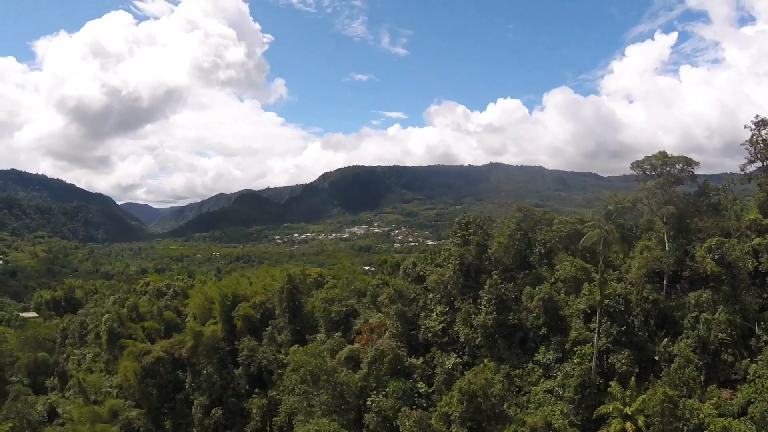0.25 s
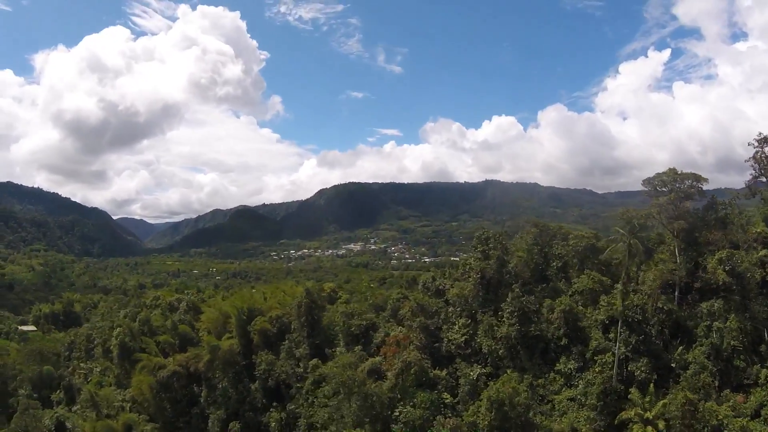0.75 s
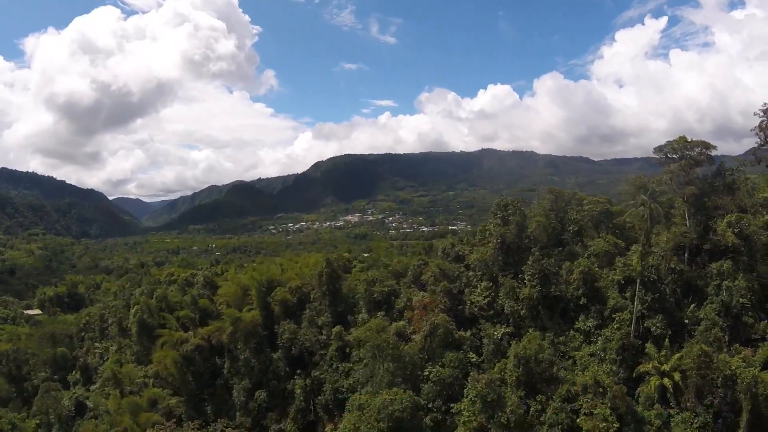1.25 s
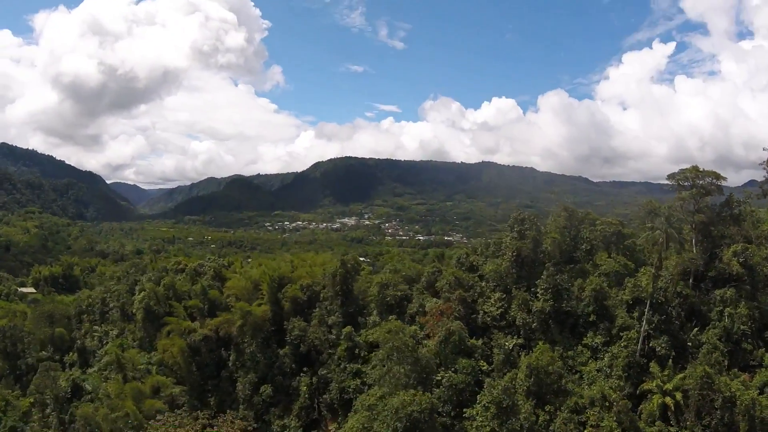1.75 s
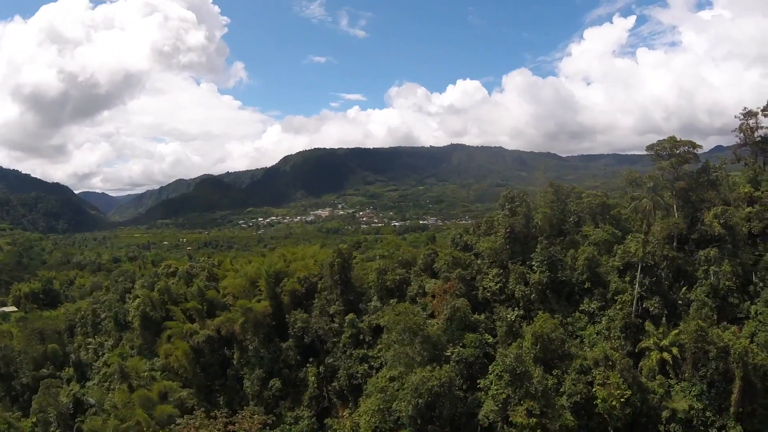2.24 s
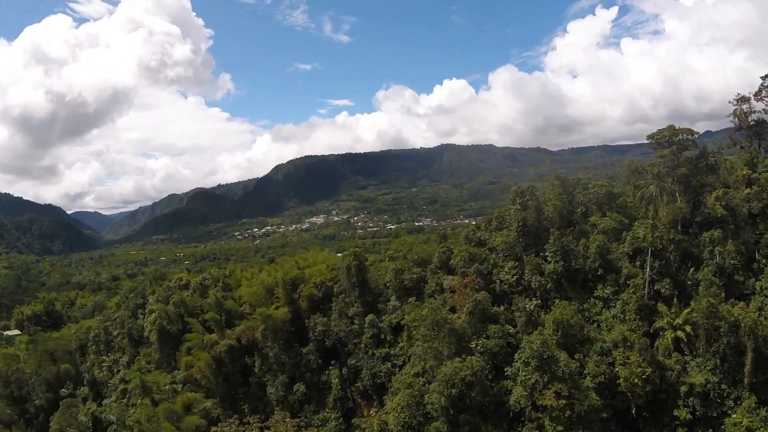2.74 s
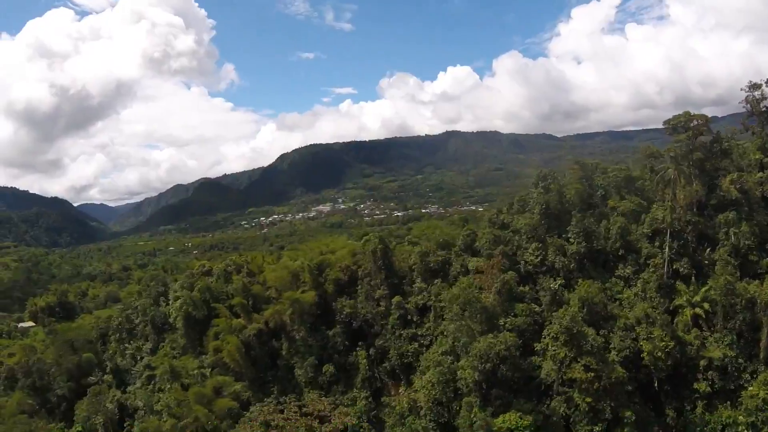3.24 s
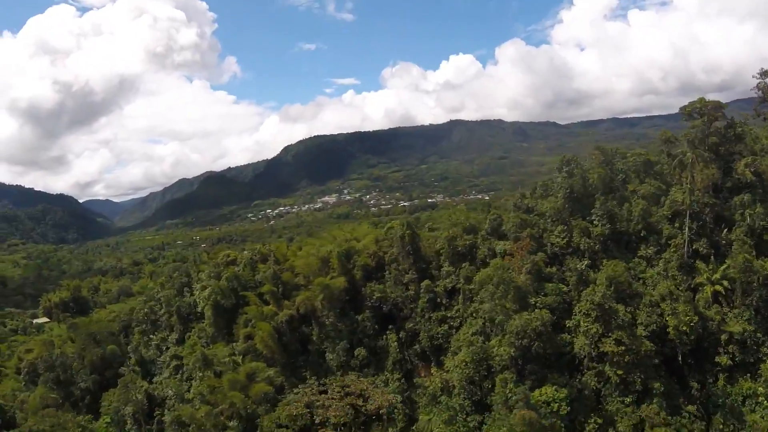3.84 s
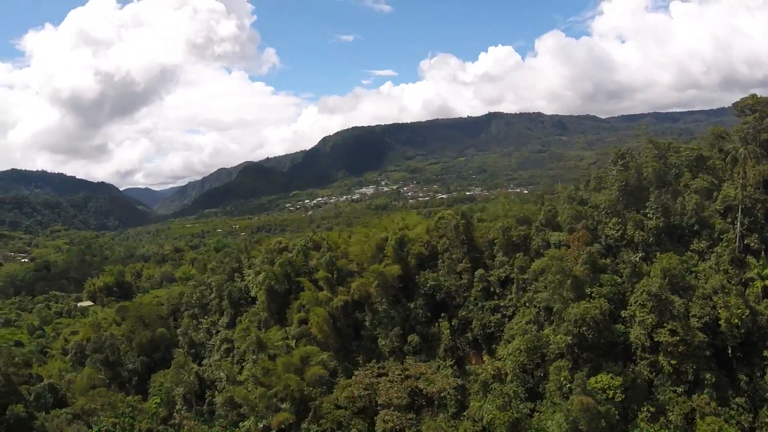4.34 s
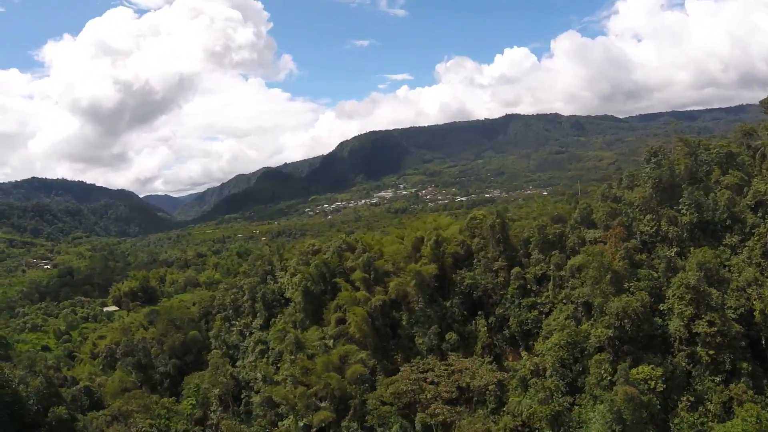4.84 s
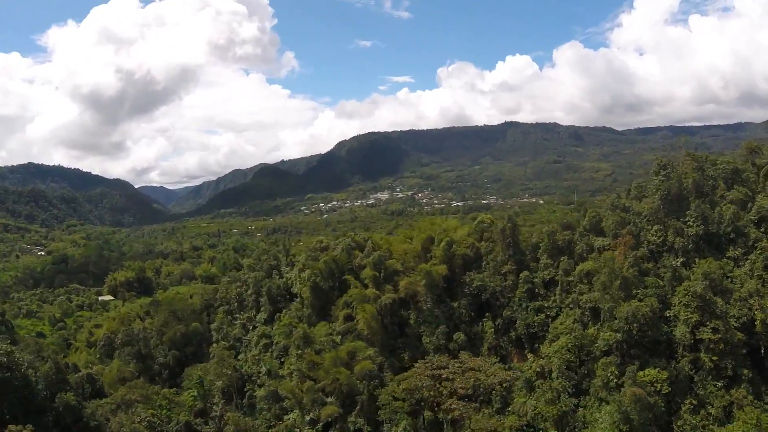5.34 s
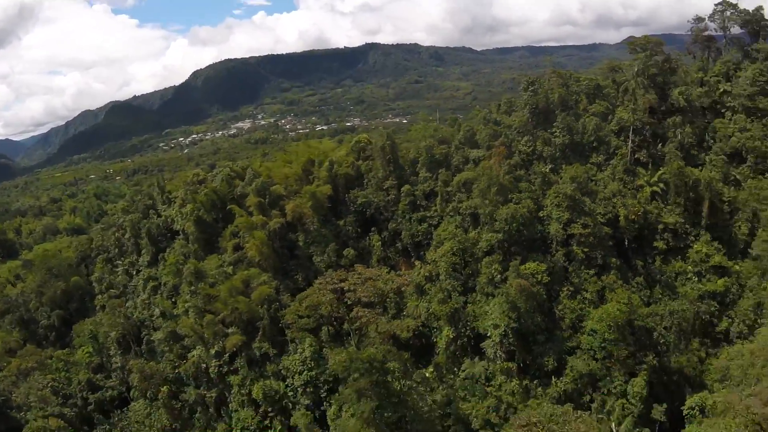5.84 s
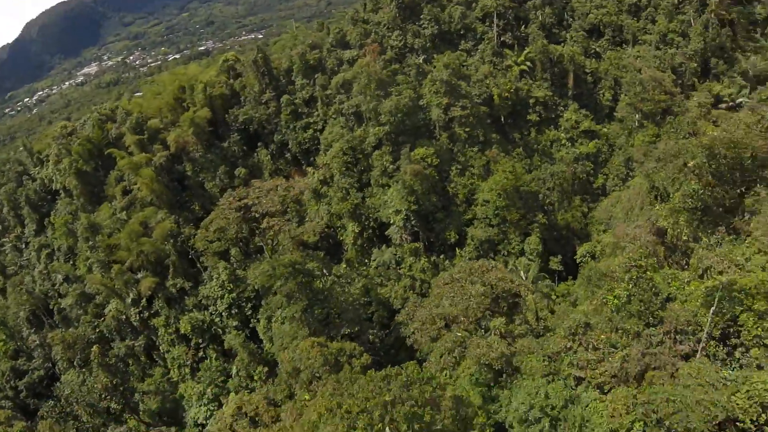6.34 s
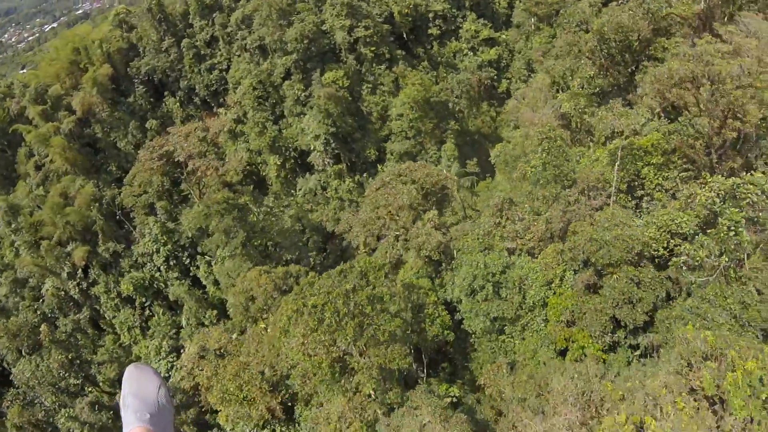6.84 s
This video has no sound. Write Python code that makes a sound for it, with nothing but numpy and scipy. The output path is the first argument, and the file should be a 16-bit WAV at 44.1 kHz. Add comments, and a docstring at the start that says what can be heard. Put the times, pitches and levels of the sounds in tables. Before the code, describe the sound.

A fast zipline trolley gives a continuous bright, gritty metallic whir with a thin high hum. Smooth wind roar fills the first second, then breaks off into deep rumble and scattered thumps. Around the middle the whir drops and turns thinner as the rider turns, and dense gusts flutter and rasp. Near the end it is fainter, with low buffets. Open air, close microphone on the rider, no echo.

```python
"""Above a forest, a zipline trolley races along a stranded steel cable, heard from a camera on the rider.
Sheaves tick over the strands: pulsed contact noise rings the trolley into a bright whir, with a thin hum.
The whir changes colour as the rider turns.
Shaped noise makes the wind: a steady roar that breaks away, then rumble, flutter, rasp and spit in gusts.
Single eddies thump the one microphone with a pressure swing, a puff and a crack."""
import sys
import numpy as np
from scipy import signal
from scipy.fft import rfft, irfft
from scipy.io import wavfile
from scipy.ndimage import uniform_filter1d, map_coordinates

SR = 44100
rng = np.random.default_rng(int(sys.argv[2]) if len(sys.argv) > 2 else 0)


def inscribe(sig):
    """Save sig as 16-bit PCM at rate SR to the path in sys.argv[1].

    A 1-D sig is mono; a 2-D sig holds one channel per row.
    Samples are clipped to [-1, 1] before scaling.
    """
    pcm = np.round(np.clip(np.atleast_2d(sig).T, -1, 1) * 32767)
    wavfile.write(sys.argv[1], SR, pcm.astype(np.int16))


N = 312624
T = np.arange(N) / SR
BINS = np.maximum(np.fft.rfftfreq(N, 1 / SR), 1)  # Hz

# colour of the finest eddies, in gusts and cracks: freq_hz, relative_db_per_hz
SPIT_COLOUR = [(600, -5.5), (1300, 4.5), (2000, 1.5), (3000, -8), (6000, -39), (12000, -59)]


def undb(db):
    """Decibels to gain."""
    return 10 ** (np.asarray(db) / 20)


def unit(x):
    """Scale to rms 1."""
    return x / np.sqrt(np.mean(x ** 2))


def curves(table):
    """Columns of a time table, interpolated to one value a sample."""
    time_s, *columns = np.transpose(table)
    return [np.interp(T, time_s, column) for column in columns]


def colour(points):
    """Gain at every frequency from (Hz, dB) points, linear in dB over log frequency."""
    hz, db = np.transpose(points)
    return undb(np.interp(np.log(BINS), np.log(hz), db))


def shaped(x, gain):
    """Filter by a gain per frequency; rms 1."""
    return unit(irfft(rfft(x) * gain, N))


def noise():
    """White noise."""
    return rng.standard_normal(N)


def walk(rate_hz):
    """Smooth chance up to the given rate; rms 1."""
    return shaped(noise(), 1 / (1 + (BINS / rate_hz) ** 4))


def steady(x, seconds):
    """Even out swells of a noise slower than the given time."""
    size = max(int(seconds * SR), 2)
    power = uniform_filter1d(uniform_filter1d(x ** 2, size), size)
    return x / np.sqrt(power + 1e-9)


def lift(x, band, db):
    """Raise or lower one band by a level that moves in time."""
    return x + irfft(rfft(x) * band, N) * (undb(db) - 1)


def strand_phase(wobble_share=.005, wobble_hz=12):
    """Phase of the strands passing under the sheaves; the speed wobbles a little."""
    # ride speed before wobble: time_s, strand_rate_hz
    speed = [(0, 751), (.4, 757), (1.05, 763.6), (1.35, 767.4), (2.25, 771.5), (2.65, 772.3), (5, 795.7),
             (7.09, 782)]
    strand_hz, = curves(speed)
    return 2 * np.pi * np.cumsum(strand_hz * (1 + wobble_share * walk(wobble_hz))) / SR


def contact_noise(phase, strands_per_turn=13.5, worn=0.5, order=768):
    """Fresh cable grit, plus sheave wear marks that come round with every turn."""
    turn = phase / (2 * np.pi * strands_per_turn) % 1
    # equally rough at every wavelength
    groove = unit(irfft(np.exp(2j * np.pi * rng.random(order // 2 + 1))))
    wear = map_coordinates(groove, [turn * order], mode="grid-wrap")
    return noise() + worn * wear


def shimmer(x):
    """Neighbouring resonances swell and fade on their own as the trolley sways."""
    width_hz, depth_db, rate_hz = 260, 1.2, 3
    for hz in np.linspace(3100, 6600, 7):
        band = 1 / (1 + ((BINS - hz) / width_hz) ** 4)
        x = lift(x, band, depth_db * walk(rate_hz))
    return unit(x)


def drift(x, drift_share=.007, drift_hz=3):
    """All resonances wander in pitch together as the load shifts."""
    wander = drift_share * walk(drift_hz)
    position = np.arange(N) + np.cumsum(wander - wander.mean())
    return map_coordinates(x, [position], order=5, mode="mirror")


def whir(phase, pulsing=0.067, pulsing_turned=0.048, flicker_db=0.33, chatter_db=0.4, treble_hz=7800):
    """Contact noise, pulsed by each strand, rings the trolley; pose decides which rings reach the microphone."""
    # whir at the microphone, shaded and bared as the rider swings: time_s, level_db
    whir_level = [(0, -21.5), (1.1, -19.5), (1.7, -20.5), (2.2, -23), (2.65, -22.5), (2.69, -27.5),
                  (3.08, -28), (3.89, -26.5), (3.98, -29.5), (4.1, -28), (4.7, -25.5), (5.2, -24),
                  (5.5, -23), (5.54, -27.5), (5.96, -28.5), (6.04, -32), (6.17, -30.5), (6.6, -32),
                  (7.09, -29)]
    # gain of the band above treble_hz: time_s, gain_db
    treble_gain = [(0, -15.5), (1.45, -9.5), (1.85, -13.5), (2.3, -7), (2.65, -7), (3.05, -7), (3.85, 1.5),
                   (5, 3), (6.55, 4), (7.09, -0.5)]
    # rider's turn: time_s, pose (0 open to the trolley, 1 half turned, 2 side on, 3 leaning,
    # 4 tipping forward, 5 looking down), hollow_gain_db
    rider_pose = [(0, 0, 0.5), (1.55, -0.2, 3), (2.0, 0.8, -10.5), (2.35, 1, -7.5), (2.65, 1.4, -8.5),
                  (2.75, 2, -11), (3.3, 2, -2.5), (3.9, 2, -2), (5.5, 2, 0), (5.72, 2.5, -2), (5.85, 3, -2),
                  (5.96, 3, 1.5), (6.05, 3.5, 2), (6.3, 4, 0), (6.48, 4, 0), (6.68, 5, 0), (7.09, 5, -5)]
    # resonances of sheaves and side plates, half gain 0.6 width off centre:
    # centre_hz, width_hz, relative_db in pose 0, 1, 2, 3, 4, 5
    resonances = [(1710, 46, -7, -14, -25, -13, -16, -7), (2280, 234, -5, -7, -9.5, -10, -11, -14),
                  (2756, 280, -5.5, -10, -12.5, -17, -21, -18), (3090, 220, 0.5, -3, -15, -17, -18, -28),
                  (3380, 280, -1.5, -2.5, -3.5, -2, -4.5, -6), (3662, 103, 3, -2, -4, 0, -1.5, -3.5),
                  (3884, 100, 0, 1, -2.5, 0, 0, -19), (4320, 690, -9, -6.5, -11, -9, -7, -6.5),
                  (4596, 62, 3, -12, -5, -12, -3, -5), (4700, 160, 2.5, -1, -5.5, -9, 1, 4.5),
                  (4910, 155, -0.5, 1, 1.5, -5, 0, 1.5), (5110, 180, 1.5, -6, -12, -12, -7, 0),
                  (5406, 165, 1, 0, 1, 3.5, -11, -4), (5590, 310, -7, -4, -11, -2, -13, -4),
                  (5806, 110, -0.5, -1.5, 3.5, 2, -9, -10), (6270, 370, -10, -12, -4, 4, -5, -22),
                  (6470, 170, 0, 2, 2.5, 3, 0, -3), (6636, 155, -2.5, -6, 3.5, 5, 2, -8),
                  (6910, 180, -4, 0.5, -3, -4, -4, -16), (7080, 220, -1.5, -7, -6.5, -10, -6, -8),
                  (7540, 260, -6.5, -7, -7, -22, -20, -22), (7820, 240, -4.5, -6, -5, -10, -10, -18),
                  (8280, 370, -26, -14, -9.5, -9, -16, -19), (8734, 236, -9, -7.5, -7, -3.5, -11, -17),
                  (9350, 370, -4.5, -14, -24, -15, -23, -21), (10680, 280, -24, -20, -23, -26, -27, -26)]
    # broad rolling noise under the resonances: freq_hz, relative_db_per_hz
    roll = [(210, -49), (720, -26), (1100, -14.5), (1450, -13), (2450, -13), (4400, -11), (7100, -13.5),
            (9100, -19.5), (10400, -29.5), (11400, -64), (12400, -47), (13300, -51)]
    hollow_hz, hollow_width_hz = 6090, 1400

    level_db, = curves(whir_level)
    treble_db, = curves(treble_gain)
    pose, hollow_db = curves(rider_pose)
    depth = np.interp(pose, [0, 1], [pulsing, pulsing_turned])
    pulses = 1 + depth * np.cos(phase)
    unevenness = undb(flicker_db * walk(5.6) + chatter_db * walk(200))
    contact = contact_noise(phase) * pulses * unevenness
    roll_power = colour(roll) ** 2
    out = 0
    for k in range(len(resonances[0]) - 2):
        ring_power = 0
        for hz, width_hz, *db in resonances:
            ring = undb(db[k]) / (1 + ((BINS - hz) / (0.6 * width_hz)) ** 2)
            ring_power = ring_power + ring ** 2
        share = np.clip(1 - abs(pose - k), 0, 1)
        out = out + share * shaped(contact, np.sqrt(ring_power + roll_power))
    out = drift(shimmer(out))
    # at some angles one band cancels
    hollow_band = 1 / (1 + ((BINS - hollow_hz) / (hollow_width_hz / 2)) ** 2)
    out = lift(out, hollow_band, hollow_db)
    # the rider shades the shortest waves most
    treble_band = 1 / (1 + (treble_hz / BINS) ** 10)
    out = lift(out, treble_band, treble_db)
    return out * undb(level_db)


def hum(phase):
    """Strands shake the whole trolley: a thin tone with two overtones, frayed by uneven contact."""
    # strand hum: time_s, level_db
    hum_level = [(0, -38), (.95, -44), (1.6, -41), (2.64, -42.5), (2.7, -52), (4.3, -44.5), (6, -53),
                 (7.09, -66)]
    waver_db, waver_hz = 1.6, 23
    fray_rad, fray_hz = .16, 40
    level_db, = curves(hum_level)
    out = 0
    for k, partial_db in enumerate([0, -12, -12], 1):
        tone = np.sin(k * (phase + fray_rad * walk(fray_hz)))
        out = out + tone * undb(level_db + partial_db + waver_db * walk(waver_hz))
    return np.sqrt(2) * out


def stream():
    """Air streaming past the camera's edge roars with slight surges, then breaks away."""
    # colour of the even flow: freq_hz, relative_db_per_hz
    roar = [(130, -20), (270, -1), (400, 1.5), (720, 0.5), (900, -3.5), (1300, -9.5), (2000, -11.5),
            (4000, -40), (12000, -76)]
    level_db, end_s, fade_s = -23.5, 0.863, 0.15
    surge_db, surge_hz = .9, 25
    level = undb(level_db + surge_db * walk(surge_hz))
    fade = np.sqrt(np.clip((end_s - T) / fade_s, 0, 1))
    return shaped(noise(), colour(roar)) * level * fade


def gust(start_s, length_s, release_s, rise_share=0.085):
    """Gust envelope: rises over a share of its length, holds and dies away."""
    rise = np.clip((T - start_s) / (rise_share * length_s), 0, 1)
    return rise * np.exp(-np.clip((T - start_s - length_s) / release_s, 0, 20))


def eddy_levels():
    """Strength of large, middle, small and finest eddies: breeze, gusts and swells add in power."""
    # light wind under the gusts: time_s, flutter_level_db
    breeze_level = [(0, -29.5), (1.6, -28.5), (2.25, -31), (2.6, -32.5), (3.04, -30.5), (3.2, -29.5),
                    (4.85, -32.5), (5.7, -32.5), (5.97, -30), (6.02, -35), (6.09, -29), (6.15, -38),
                    (6.22, -27.5), (6.55, -31), (6.78, -33.5), (6.83, -40.5), (6.95, -34.5), (7.09, -34)]
    # gusts: start_s, length_s, flutter_db, rasp_db, spit_db
    gusts = [(0.784, 0.093, -18, -28, -41), (0.808, 0.054, -23, -25.5, -26), (0.883, 0.21, -31.5, -43, -57),
             (1.342, 0.16, -31, -44, -42), (1.736, 0.12, -29, -49, -55), (2.706, 0.093, -19.5, -25.5, -33),
             (2.821, 0.091, -23.5, -26.5, -34), (2.918, .072, -22, -31, -35), (3.07, 0.09, -28, -31, -38),
             (3.158, .1, -25, -26.5, -32), (3.258, .23, -26.5, -26.5, -33.5),
             (3.496, 0.13, -21.5, -25.5, -32.5), (3.663, 0.057, -26.5, -32.5, -45),
             (3.807, 0.075, -24, -38, -40), (3.966, 0.15, -25, -31.5, -37.5),
             (4.116, 0.081, -21, -29, -37.5), (4.23, 0.099, -21.5, -29, -36),
             (4.343, .13, -21.5, -27.5, -35.5), (4.49, 0.083, -27.5, -30.5, -37.5),
             (4.577, 0.15, -26.5, -30, -35), (4.74, 0.161, -37.5, -34.5, -42),
             (4.91, 0.13, -23.5, -28, -36), (5.037, 0.25, -21.5, -29, -31),
             (5.267, 0.25, -23.5, -29.5, -35.5), (5.529, 0.067, -21, -30, -37.5),
             (5.612, 0.091, -18, -28, -32.5), (5.746, 0.044, -23, -31, -45), (5.893, 0.025, -25, -43, -57),
             (6.212, 0.11, -37.5, -42, -50), (6.433, 0.11, -26.5, -34, -51),
             (6.971, 0.081, -28.5, -37.5, -56)]
    # large slow eddies that swell the rumble: centre_s, level_db
    swells = [(.45, -23), (1.02, -17), (1.38, -26), (1.82, -15), (2.33, -18), (2.51, -19), (2.72, -17),
              (3.02, -19.5), (3.68, -18.5), (3.96, -24), (4.28, -16.5), (4.52, -17), (5.03, -18.5),
              (5.6, -15.5), (5.73, -22), (5.9, -18.5), (6.25, -21), (6.44, -16), (6.54, -20.5), (6.68, -22),
              (7.05, -23)]
    breeze_rumble_db, breeze_rasp_db = 8, -10  # relative to the breeze's flutter
    gust_rumble_db = -1.5  # relative to the gust's flutter
    release_s, fine_release_s = 0.031, .012  # rasp and spit die sooner than flutter
    swell_s = 0.047  # centre to 1/e power

    breeze = undb(curves(breeze_level)[0])
    middle, small, finest = 0, 0, 0  # powers
    for start_s, length_s, flutter_db, rasp_db, spit_db in gusts:
        middle = middle + (gust(start_s, length_s, release_s) * undb(flutter_db)) ** 2
        fine = gust(start_s, length_s, fine_release_s) ** 2
        small = small + fine * undb(rasp_db) ** 2
        finest = finest + fine * undb(spit_db) ** 2
    large = middle * undb(gust_rumble_db) ** 2
    for centre_s, level_db in swells:
        large = large + undb(level_db) ** 2 * np.exp(-np.minimum(abs(T - centre_s) / swell_s, 10) ** 2)
    large = large + (breeze * undb(breeze_rumble_db)) ** 2
    middle = middle + breeze ** 2
    small = small + (breeze * undb(breeze_rasp_db)) ** 2
    return [np.sqrt(power) for power in (large, middle, small, finest)]


def wind(patchy_db=2.5, tearing_db=3.0, surge_db=0.5, surge_hz=14, grain_db=3, grain_hz=300):
    """Large eddies break into smaller ones: patchy flutter, rasp and spit over the rumble."""
    # colour of each eddy size: freq_hz, relative_db_per_hz
    rumble_colour = [(10, -16), (22, -6.5), (45, 4), (70, 0.5), (110, -3), (155, -8), (250, -22),
                     (600, -107)]
    flutter_colour = [(60, -24), (120, 2), (170, 2.5), (280, 0), (450, -10), (700, -17), (1500, -63),
                      (4000, -94)]
    rasp_colour = [(200, -14), (400, 6.5), (560, -0.5), (800, -3.5), (1200, -10.5), (2000, -26.5),
                   (3000, -20.5), (6000, -35), (12000, -70)]
    ragged_db, ragged_hz = 1.2, 50

    large, middle, small, finest = eddy_levels()
    surge = undb(surge_db * walk(surge_hz))
    rumble = steady(shaped(noise(), colour(rumble_colour)), seconds=0.13)
    patches_db = patchy_db * walk(60)
    flutter = steady(shaped(noise() * undb(patches_db), colour(flutter_colour)), seconds=0.089)
    # the flow tears most while the rumble sucks
    torn = undb(patches_db - tearing_db * np.tanh(rumble))
    rasp = steady(shaped(noise() * torn, colour(rasp_colour)), seconds=0.0087)
    # spit comes in grains, only in the gusts
    grains = undb(grain_db * walk(grain_hz))
    spit = steady(shaped(noise() * torn * grains, colour(SPIT_COLOUR)), seconds=0.01)
    # rasp and spit flare unevenly, together
    ragged = unit(undb(ragged_db * walk(ragged_hz)))
    fine = ragged * (rasp * small + spit * finest)
    return rumble * large + surge * (flutter * middle + fine)


def buffets(puff_s=0.0044, lead_s=0.0046, crack_s=0.0019):
    """A passing eddy sucks, then pushes on the microphone, with a crack and a dull puff of torn air."""
    # eddies that slap the microphone: time_s, pressure_db, swing_s, puff_db, crack_db
    slaps = [(0.799, -7, 0.0009, -21, -40), (0.811, -18, 0.0027, -28, -28), (0.827, -8, 0.0017, -19, -21),
             (0.854, -6, 0.00187, -16, -28), (1.263, -11, 0.0028, -25, -50),
             (1.301, -14.5, 0.0013, -20, -40), (1.372, -8, 0.0023, -27, -45), (1.414, -9, 0.0014, -27, -40),
             (1.657, -15, 0.0014, -20, -38), (1.721, -6, 0.0024, -22, -34), (1.852, -15, 0.0012, -18, -40),
             (2.084, -13, 0.0018, -31, -54.5), (2.512, -11, 0.0013, -35, -55),
             (2.681, -14, 0.0016, -23.5, -50), (2.709, -7.5, 0.0022, -21, -23.5),
             (2.759, -10.5, 0.00087, -23, -31), (2.835, -11, 0.00086, -23, -40),
             (2.974, -13, 0.0028, -22.5, -28), (3.05, -16, .003, -27, -34), (3.217, -18, 0.0012, -19, -26),
             (3.602, -18, 0.00089, -20, -24), (3.622, -15, 0.0013, -25, -33), (3.82, -13, 0.0031, -29, -23),
             (3.956, -5, 0.0026, -21, -41), (3.981, -13, .002, -25, -31), (4.127, -19, 0.0013, -20, -28),
             (4.152, -16, .0012, -24, -29), (4.401, -8, .0012, -19.5, -31), (4.447, -10, 0.0019, -29, -24),
             (5.057, -18, .0015, -27, -29), (5.16, -12, 0.001, -21, -33), (5.749, -4.5, 0.0024, -27, -41),
             (5.77, -8, 0.0018, -25, -38), (5.861, -8, 0.0028, -21.5, -31), (5.9, -11.5, 0.002, -19.5, -35),
             (6.052, -5.5, 0.0027, -19, -31), (6.193, -14, 0.0045, -25.5, -43),
             (6.276, -9, 0.0029, -28, -45), (6.293, -20, 0.0034, -24, -38), (6.417, -5, 0.0024, -17, -27),
             (6.437, -14, 0.0021, -26, -42), (6.481, -12, 0.0016, -20, -41), (6.512, -10, 0.004, -20, -41),
             (6.607, -12, 0.0042, -24, -40), (6.669, -16, .002, -24.5, -45),
             (6.694, -19, 0.0038, -22.5, -42), (6.783, -10, 0.0015, -22.5, -44),
             (6.8, -8, 0.0018, -26, -47), (6.903, -7.5, 0.0019, -20, -36), (7.032, -11, 0.0048, -25, -42),
             (7.058, -12, 0.0015, -28, -42)]
    # colour of the soft puff: freq_hz, relative_db_per_hz
    puff_colour = [(90, -27), (220, 8), (420, 0), (700, -4.5), (1100, -15.5), (1700, -30), (2400, -39),
                   (6000, -70)]
    out = np.zeros(N)
    dull = steady(shaped(noise(), colour(puff_colour)), seconds=0.0094)
    bright = steady(shaped(noise(), colour(SPIT_COLOUR)), seconds=0.0094)
    for time_s, pressure_db, swing_s, puff_db, crack_db in slaps:
        near = slice(*np.searchsorted(T, [time_s - .05, time_s + .08]))
        u = (T[near] - time_s) / swing_s
        swing = undb(pressure_db) * u * np.exp((1 - u ** 2) / 2)
        # puff and crack set in lead_s before the middle of the swing
        age_s = np.maximum(T[near] - time_s + lead_s, 0)
        puff = undb(puff_db) * dull[near] * age_s / puff_s * np.exp(1 - age_s / puff_s)
        crack = undb(crack_db) * bright[near] * age_s / crack_s * np.exp(1 - age_s / crack_s)
        out[near] += swing + puff + crack
    return out


def scene():
    """Trolley and wind at one microphone, the same in both channels."""
    phase = strand_phase()
    mono = whir(phase) + hum(phase) + stream() + wind() + buffets()
    return np.array([mono, mono])


def record(dry, ceiling=1.8, top_hz=13400):
    """The camera rounds the strongest peaks and cuts the top."""
    rounded = ceiling * np.tanh(dry / ceiling)
    low_pass = signal.ellip(8, .2, 70, top_hz, fs=SR, output="sos")
    return signal.sosfilt(low_pass, rounded)


dry = scene()
out = record(dry)
inscribe(out)
```